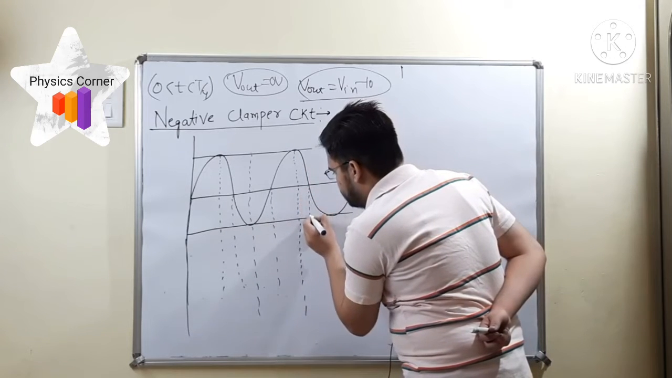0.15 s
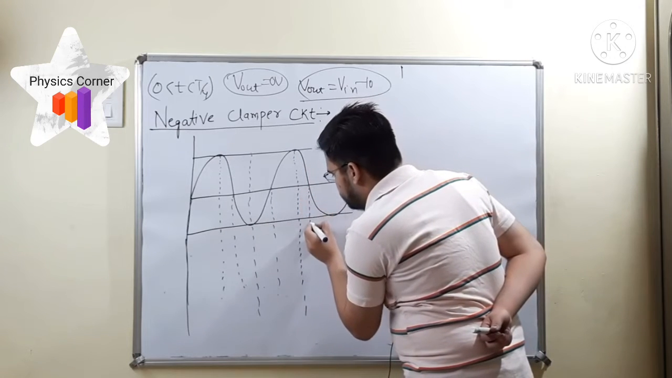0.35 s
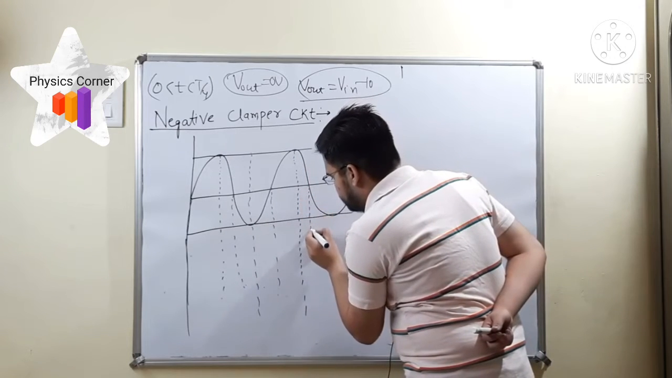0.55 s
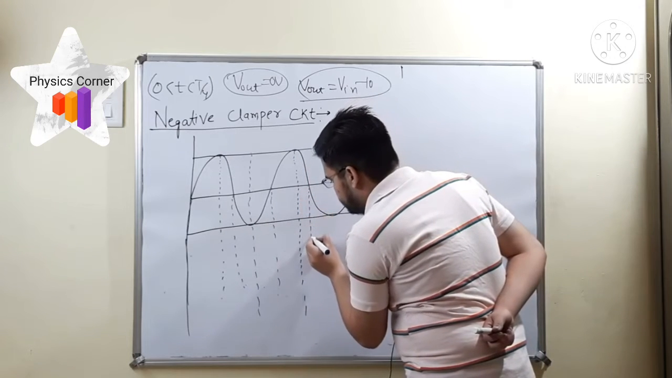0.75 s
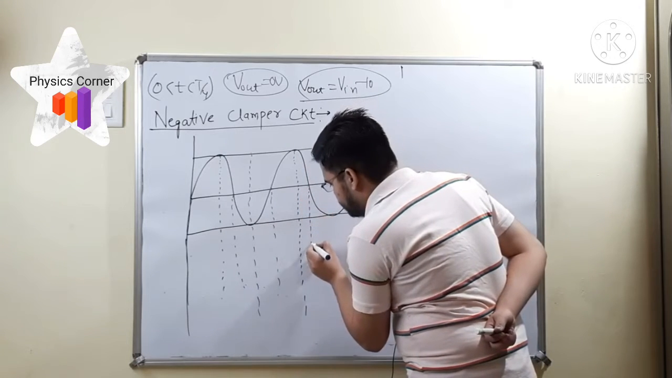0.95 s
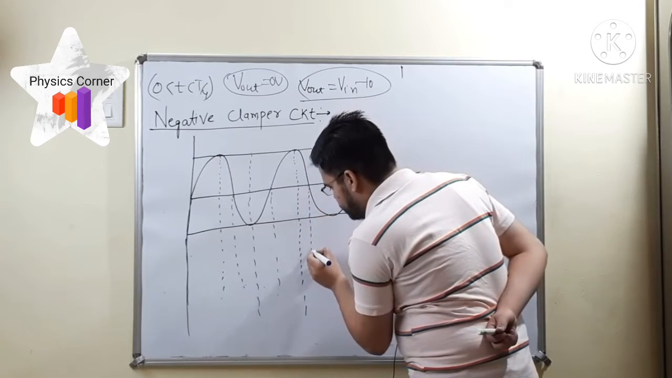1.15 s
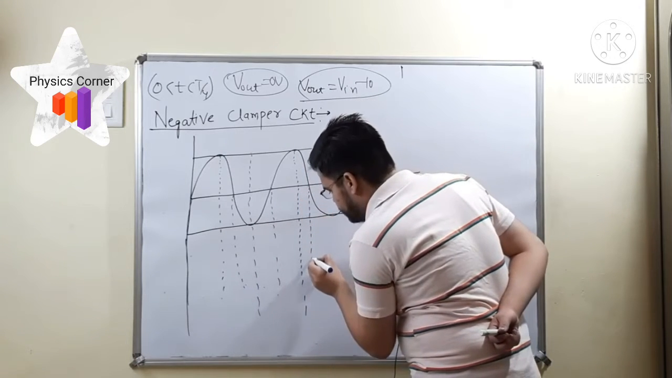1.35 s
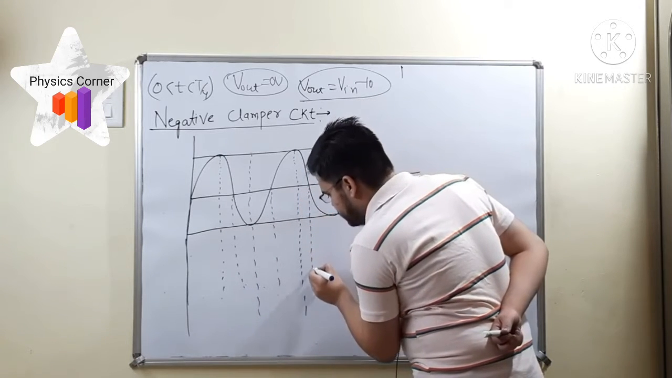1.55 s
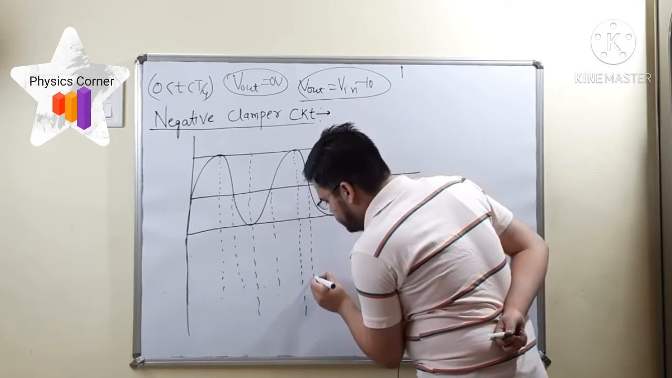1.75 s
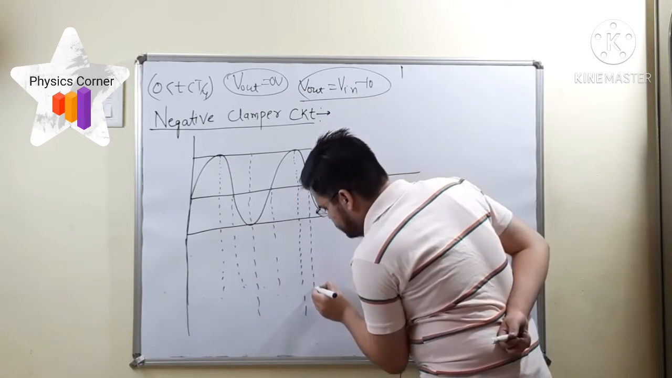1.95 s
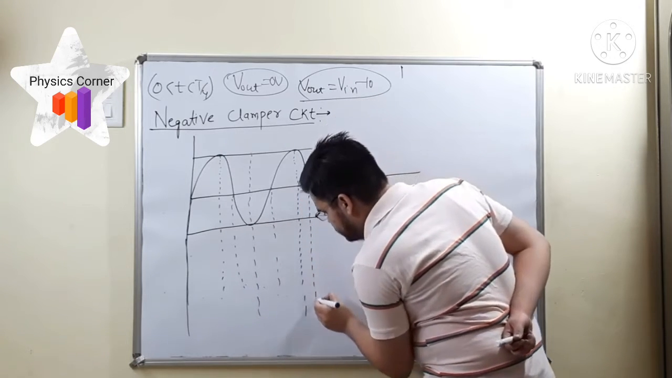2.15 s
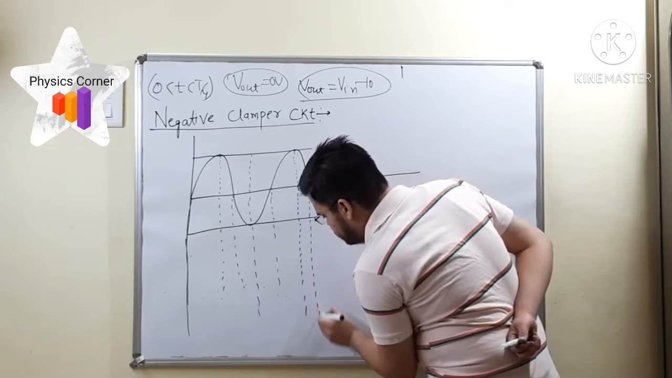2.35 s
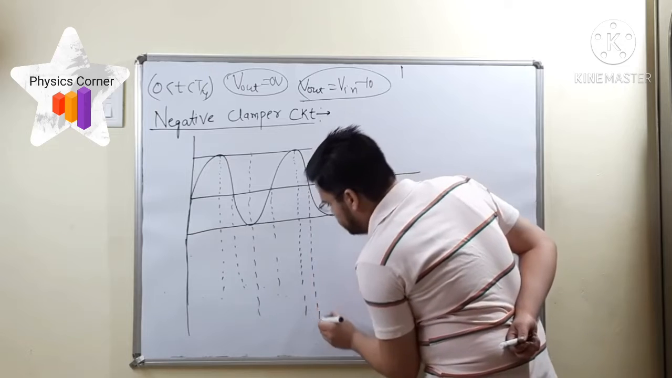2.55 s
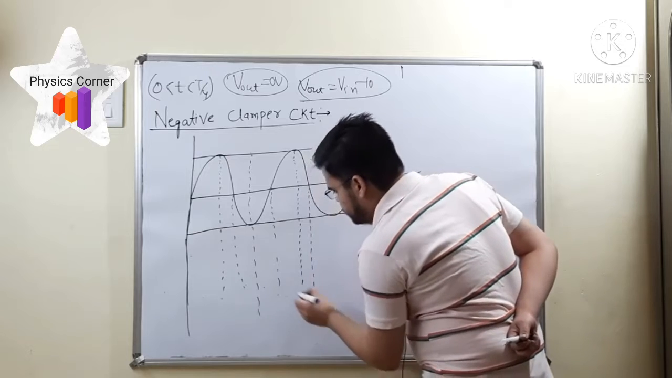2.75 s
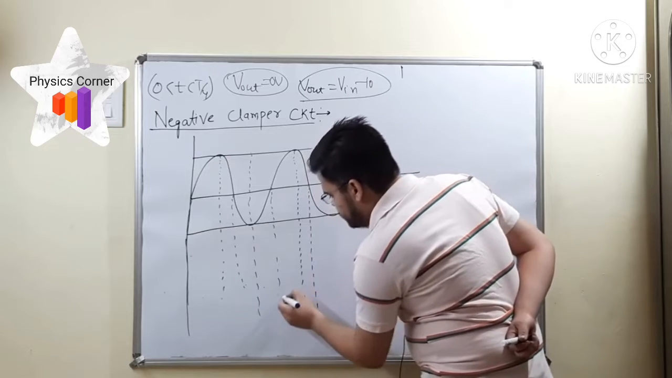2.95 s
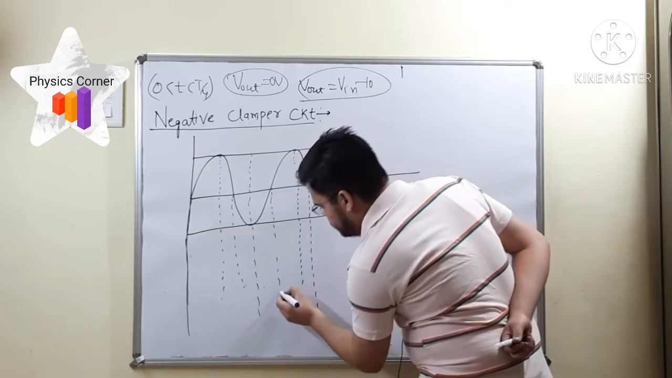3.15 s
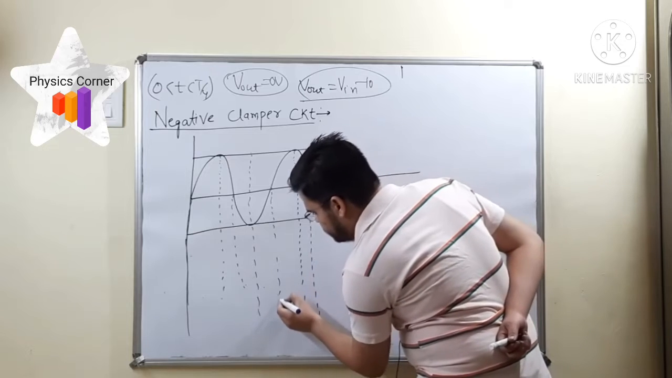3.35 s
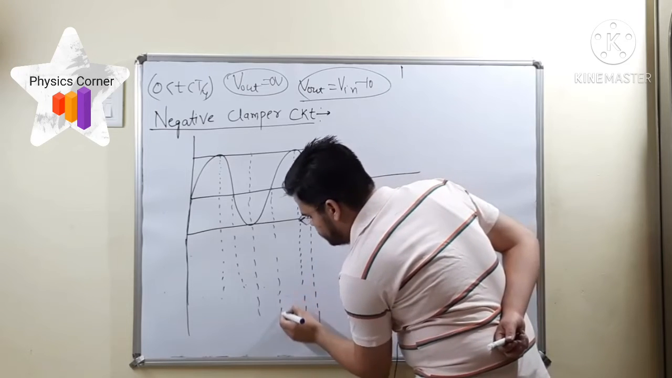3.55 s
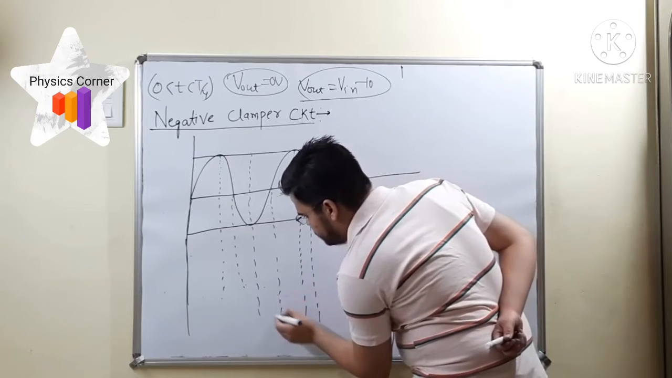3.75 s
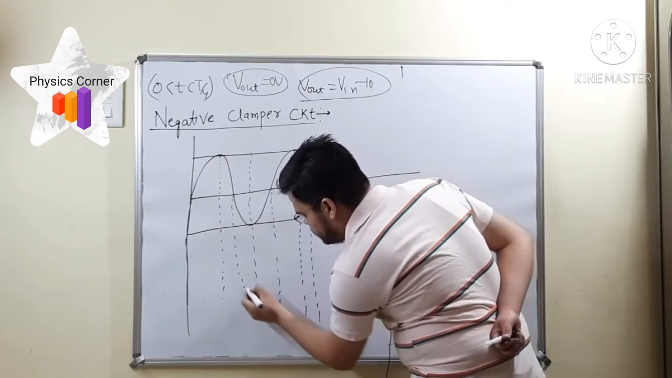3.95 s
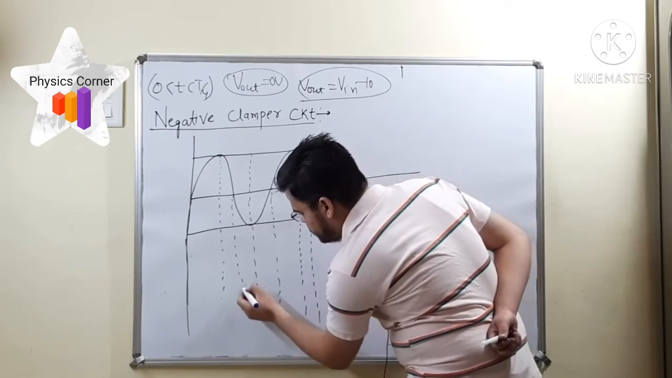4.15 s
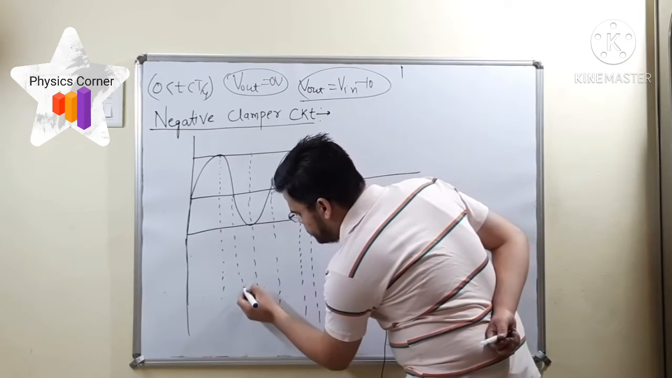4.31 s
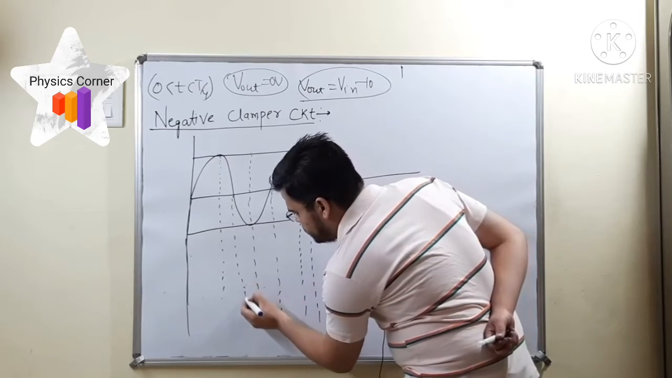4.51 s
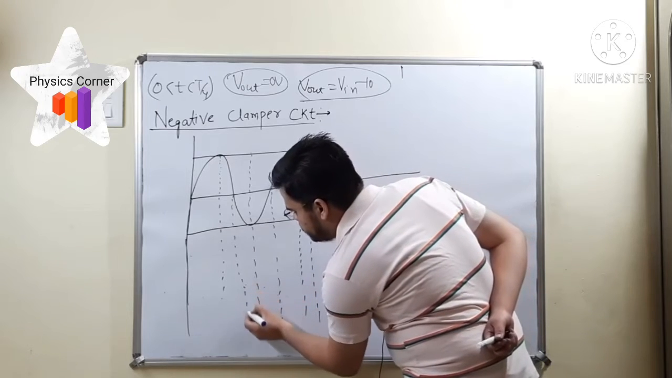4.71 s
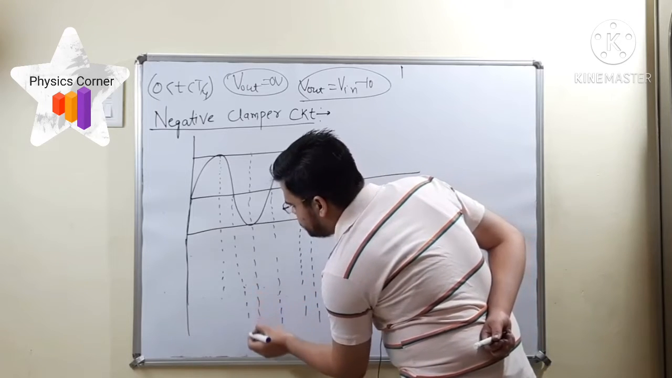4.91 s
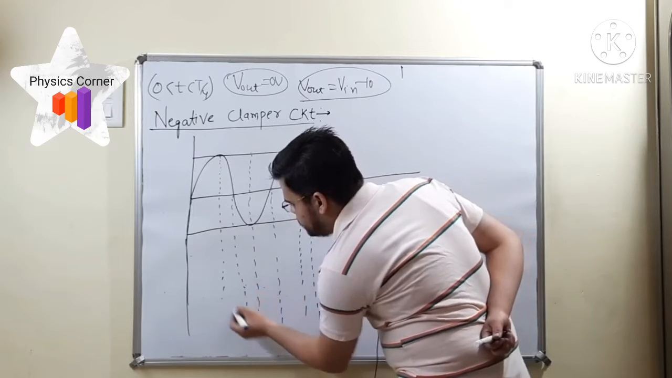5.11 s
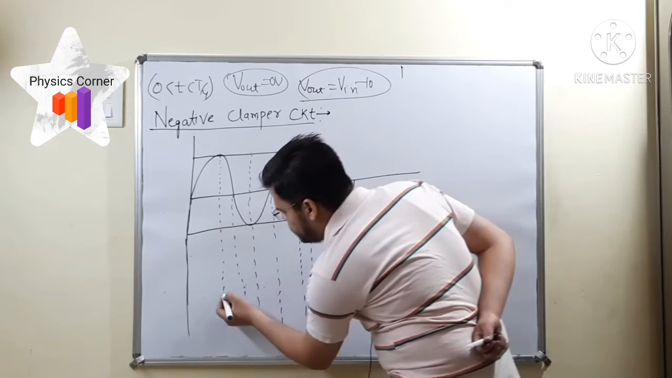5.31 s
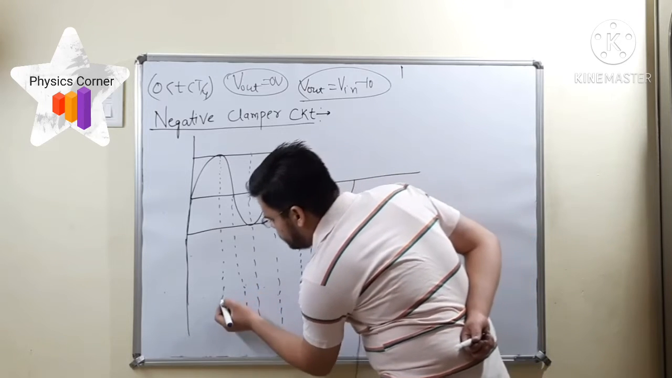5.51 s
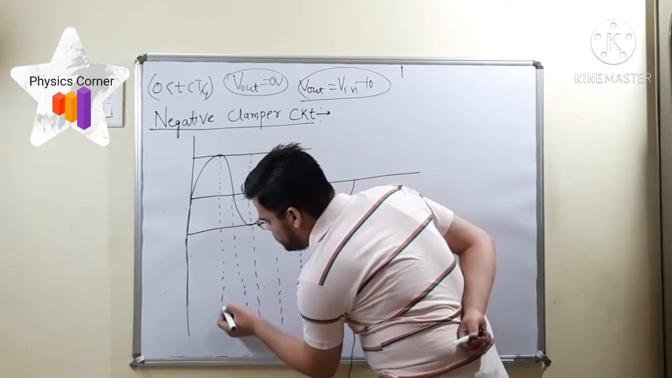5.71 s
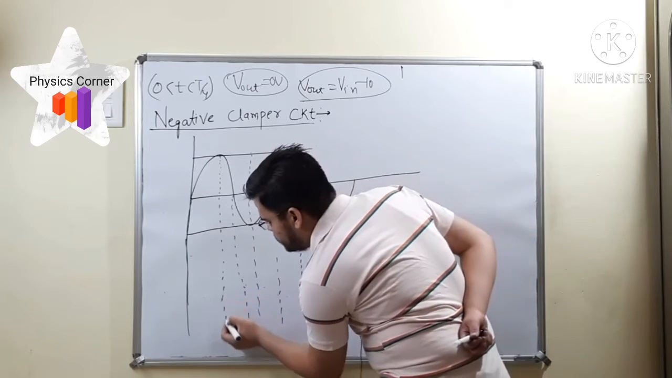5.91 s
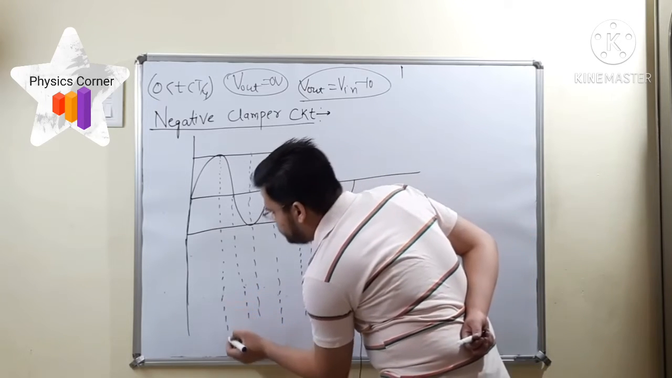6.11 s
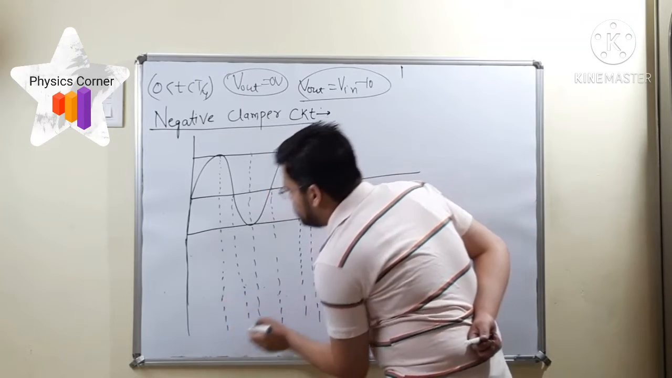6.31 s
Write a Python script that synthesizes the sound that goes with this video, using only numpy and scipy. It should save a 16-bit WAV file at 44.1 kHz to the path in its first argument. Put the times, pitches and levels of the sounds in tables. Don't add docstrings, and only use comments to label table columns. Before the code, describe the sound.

Dull panel taps from a marker come in uneven runs, with faint felt squeaks, sleeve rustles and small snaps over low room rumble.

```python
import sys
import numpy as np
from scipy import signal
from scipy.io import wavfile
from scipy.ndimage import uniform_filter1d

SR = 44100
rng = np.random.default_rng(int(sys.argv[2]) if len(sys.argv) > 2 else 0)


def boost_factor(decibels):
    exponent = np.asarray(decibels, float) / 20
    return 10 ** exponent


def generate_wav(signal):
    frames = np.transpose(np.atleast_2d(signal))
    scaled = np.clip(frames, -1, 1) * 32767
    pcm = np.round(scaled).astype(np.int16)
    wavfile.write(sys.argv[1], SR, pcm)


N = 285327
LEAD = SR // 4


def evened(x):
    return x / np.sqrt(np.mean(x ** 2) + 1e-20)


def read(points, hz):
    f, value = np.transpose(points)
    return np.interp(np.log(hz + 1), np.log(f + 1), value)


def add(mix, s, sound):
    part = mix[LEAD + round(s * SR):][:len(sound)]
    part += sound[:len(part)]


def resonate(x, modes):
    out = 0
    for k, (hz, width, db) in enumerate(modes):
        b, a = signal.iirpeak(hz, hz / width, SR)
        twice = signal.lfilter(b, a, signal.lfilter(b, a, x))
        out = out + (-1) ** k * boost_factor(db) * twice
    return out


def noise(spectrum, patchy_db, flicker_db):
    frames, hz = (N + LEAD) // 256 + 5, np.fft.rfftfreq(1024, 1 / SR)
    a, b, patches = rng.standard_normal((frames, 513, 3)).T
    patches = uniform_filter1d(patches, size=12, axis=0)
    patches = evened(uniform_filter1d(patches, size=14, axis=1))
    flicker = evened(uniform_filter1d(rng.standard_normal(frames), size=3))
    level_db = read(spectrum, hz)[:, None] + patchy_db * patches + flicker_db * flicker
    z = (a + 1j * b) * boost_factor(level_db)
    return evened(signal.istft(z, nperseg=1024, noverlap=768)[1][:N + LEAD])


def shares(s, db, upper_db, hard_db, lift_db):
    # (start [s], sway [dB], low mode [dB])
    strips = [
        (-1, 1, 2),
        (1.7, -13, 2.5),
        (3.5, -5.5, -0.2),
        (3.65, -4, -6),
        (4.2, -6, -7.5),
        (4.5, -1.5, 1),
    ]
    over = db + 25
    sway_db, low_db = [row[1:] for row in strips if row[0] <= s][-1]
    deep_db = -23.5 - 0.35 * over
    low_db = -16.5 - 0.47 * over + low_db + lift_db
    middle_db = 0.38 * upper_db
    return [0, deep_db, deep_db + sway_db, low_db, middle_db, upper_db, hard_db]


def board():
    # (time [s], blow [dB], upper modes [dB], hardness [dB]); near the frame upper modes wake
    dabs = [(0.164, -32.5, -19.5, -38), (0.358, -43.5, -35, -31), (0.543, -26, -27.5, -29.5),
            (0.964, -28, -44, -34), (1.178, -28.5, -53, -40), (1.402, -33, -58, -39),
            (1.571, -39.5, -41, -36), (1.758, -29.5, -29, -41), (1.934, -23.5, -13.5, -49),
            (2.097, -23, -11, -38), (2.272, -22.5, -12, -32), (2.396, -26, -8.5, -33),
            (3.266, -20.5, -7.5, -21), (3.434, -22, -7.5, -30.5), (3.583, -18.5, -3.5, -24.5),
            (3.697, -22, -3.5, -29), (4.323, -26.5, -10.5, -27), (4.506, -21.5, -10, -33),
            (4.665, -22.5, -6.5, -30), (4.812, -22, -4, -23), (5.63, -29, -5.5, -21.5),
            (5.814, -26.5, -7, -34), (5.963, -24.5, -3.5, -26.5)]
    earlier_dab = (-.05, -31, -14, -30)
    # (time [s], blow [dB], upper modes [dB])
    lifts = [
        (0.062, -41, -18),
        (0.636, -43, -30),
        (0.678, -45.5, -34),
        (0.767, -52.5, -19),
        (1.055, -63, -25),
        (1.099, -45.5, -24),
        (3.753, -35, -3),
        (4.459, -51, -6.5),
        (4.948, -38.5, -24),
        (6.098, -36, -8),
    ]
    # (pitch [Hz], level [dB], hold [s])
    panel = [
        [(209, -41, 0.0073), (245.2, 4, 0.024), (268.8, -6, 0.019)],
        [(39.2, 5.5, 0.075)],
        [(71.5, 5.5, 0.13)],
        [(141.7, 4.5, 0.033)],
        [(329.2, -8.5, 0.031)],
        [(397.8, 7, 0.014), (466, -8.5, 0.01)],
        [(589, 8.5, 0.011), (670, -4, 0.0069), (803, 0, 0.011), (1053, -7, 0.0065)],
    ]
    # (pitch [Hz], level [dB], time to fall 60 dB [s])
    frame = [
        [(234.55, -14.5, 0.49), (255.3, -28.5, 1), (221, -33, 0.39)],
        [(57, -7, 0.57)],
        [(77.7, 6, 0.76)],
        [(134.05, -2, 0.45), (118, -13, 0.14)],
        [(339, -21, 0.69)],
        [(386, -17, 0.71), (456.1, -14.5, 0.27)],
        [(570, -14, 0.98), (510, -16.5, 0.4), (629.5, -7.5, 0.19)],
    ]
    facing = [1, 1, 1, 1, -1, -1, -1]
    build_s = [0.0035, 0.017, 0.0036, 0.0028, 0.0075, 0.0036, 0.0022]
    lift_hard_db, lift_low_db = -31.5, -18

    blows = [(*row, 0) for row in [earlier_dab, *dabs]]
    blows += [(*row, lift_hard_db, lift_low_db) for row in lifts]
    detune = 1 + .01 * rng.standard_normal((len(blows), len(panel)))
    out, t = np.zeros(N + LEAD), np.arange(SR // 2) / SR
    rings = []
    for group in frame:
        ring = 0
        for hz, db, t60 in group:
            fade = boost_factor(db - 60 * t / t60) * (1 - np.exp(-t / 0.0046))
            ring = ring + fade * np.sin(2 * np.pi * hz * t)
        rings.append(ring)

    t = t[:SR // 10]
    for (s, db, *touch_db), shift in zip(blows, detune):
        groups = zip(panel, rings, facing, shares(s, db, *touch_db), shift, build_s)
        for group, ring, sign, group_db, d, build in groups:
            swell = 1 - np.exp(-(t / build) ** 1.5)
            for hz, level_db, hold in group:
                drop = np.exp(-(t / hold) ** 2.8)
                mode = swell * drop * np.sin(2 * np.pi * hz * d * t)
                add(out, s - .003, sign * boost_factor(db - 4.0 + group_db + level_db) * mode)
            add(out, s - .003, sign * boost_factor(db + group_db) * ring)
    return out


def drag():
    # (time [s], level [dB], barrel pitch [Hz], length [s])
    drags = [(0.173, -64, 5830, 0.096), (0.343, -64.5, 5450, 0.093), (0.54, -64, 5700, 0.12),
             (0.72, -66, 5570, 0.088), (0.9632, -61, 6160, 0.045), (1.174, -58, 6100, 0.088),
             (1.396, -58, 6130, 0.08), (1.572, -57, 6040, 0.072), (1.76, -58, 6160, 0.05),
             (1.932, -55, 5840, 0.053), (2.096, -53.5, 5700, 0.056), (2.27, -54.5, 5600, 0.032),
             (2.396, -50.5, 5700, 0.063), (3.274, -56, 5750, 0.036), (3.431, -59.5, 5600, 0.039),
             (3.58, -52, 5700, 0.035), (3.7, -50, 5960, 0.033), (4.66, -62, 6100, 0.037),
             (4.811, -57, 5700, 0.037), (5.59, -62, 6060, 0.073), (5.9633, -57, 5500, 0.051),
             (6.067, -55, 5650, 0.027)]
    # (share of the pitch, width [Hz], level [dB])
    barrel = [
        [(.75, 600, -4), (.99, 650, 6), (1.14, 805, -0.5)],
        [(1.4, 1110, 0)],
        [(1.73, 860, 14), (1.98, 1100, 6)],
    ]
    slack_hz = 5600

    out = np.zeros(N + LEAD)
    size = (len(drags), 6000)
    slips = rng.standard_normal(size) * boost_factor(2.5 * np.minimum(rng.exponential(1, size), 4))
    for (s, db, hz, length), slip in zip(drags, slips):
        shade_db = -10 * (s > 5.9)
        middle_db = -3 - 11 * 10 * (hz / slack_hz - 1) + shade_db
        band_db = [0, middle_db, -5 + shade_db]
        u = np.linspace(0, 1, int(np.clip(length * SR, 50, len(slip))))
        landing = 0.25 * np.exp(-u / 0.018)
        stroke = np.minimum(u / 0.037, 1) * (np.sqrt(1 - u ** 4.2) + landing)
        marker = 0
        for level_db, band in zip(band_db, barrel):
            modes = [(hz * share, width, mode_db) for share, width, mode_db in band]
            marker = marker + boost_factor(level_db) * evened(resonate(slip, modes))
        add(out, s, boost_factor(db - 10.5) * stroke * marker[:len(u)])
    return out


def snaps():
    # (time [s], peak [dB], pitch [Hz], length [cycles])
    creaks = [
        (1.36, -52, 7000, 15),
        (5.205, -43, 2310, 5.6),
        (5.249, -45, 1380, 3.3),
        (5.384, -37.5, 2580, 5.1),
        (5.779, -42, 6400, 5),
        (5.811, -53, 5800, 8.9),
        (2.445, -60, 11600, 10),
        (5.62, -53, 7240, 30),
    ]
    knuckle = [
        (5.3147, -35, 680, 4),
        (5.3146, -37, 1180, 3.5),
        (5.384, -42, 420, 2.5),
    ]
    out = np.zeros(N + LEAD)
    for s, db, hz, cycles in [*creaks, *knuckle]:
        turns = np.arange(round(3 * cycles / hz * SR)) * hz / SR
        fade = np.exp(-2.5 * turns / cycles) * np.minimum(3 * turns, 1)
        add(out, s, boost_factor(db) * np.sin(2 * np.pi * turns) * fade)
    return out


def sleeve():
    # (peak time [s], level [dB], rise [s], fall [s], dull share [dB])
    swishes = [
        (2.54, -59, 0.083, 0.15, -8),
        (3.93, -67, 0.089, 0.24, 0.5),
        (5.2, -58.5, 0.097, .16, -0.5),
        (5.371, -52, 0.046, .04, -8),
        (5.419, -64.5, 0.08, 0.17, -5),
        (5.96, -75.5, 0.21, 0.14, 10.5),
    ]
    # (pitch [Hz], level per Hz [dB])
    cloth = [(1800, -11), (3200, -8.5), (4900, -2.5), (7000, -6), (9000, -6), (11300, -3.5), (13500, -15),
             (15400, -23)]
    fold_colour = [(250, -45), (600, 6.0), (1200, 2), (2200, -1.0), (3500, -1.0), (4500, -15)]
    fibre = noise(cloth, patchy_db=1.8, flicker_db=1.5)
    fold = noise(fold_colour, patchy_db=1.4, flicker_db=1.2)
    t, out = (np.arange(N + LEAD) - LEAD) / SR, 0
    for s, db, rise, fall, dull_db in swishes:
        away = np.where(t < s, (s - t) / rise, (t - s) / fall)
        level = boost_factor(db - 16.5 * away ** 1.58)
        out = out + level * (fibre + boost_factor(dull_db) * fold)
    return out


def clock():
    tick_db = [-58, -57.5, -58.5, -55.5, -57, -54.5, -56.5]
    # (pitch [Hz], width [Hz], level [dB])
    case = [(802, 184, -0.5), (975, 220, -7), (1200, 380, -12.5), (1630, 650, -12.5), (2510, 170, -9.5),
            (2810, 290, -7.5), (3520, 4500, -21), (5700, 1200, -19)]
    steps, t = np.zeros(N + LEAD), np.arange(SR // 10) / SR
    rattle = rng.standard_normal((len(tick_db), len(t))) * np.exp(-t / 0.047)
    for k, db in enumerate(tick_db):
        add(steps, 0.97 + k - 1, boost_factor(db + 11.5) * rattle[k])
    return resonate(steps, case)


def room(x):
    # (pitch [Hz], time to fall 60 dB [s])
    echo_times = [(40, .6), (130, 0.79), (240, 0.86), (400, 1.015), (700, 0.44), (1500, 1.09), (4000, 0.29),
                  (10000, 0.13)]
    taps = np.zeros((3, SR))
    at = np.arange(300, SR - 20, 20) + rng.integers(0, 20, (3, (SR - 301) // 20))
    np.put_along_axis(taps, at, rng.choice([-1., 1.], at.shape), axis=1)
    hz, t, z = signal.stft(taps, SR, nperseg=1024)
    fade = boost_factor(-60 * t / read(echo_times, hz)[:, None])
    tails = signal.istft(z * fade, SR, nperseg=1024)[1]
    tails *= np.clip((np.arange(tails.shape[1]) / SR - .008) / 0.01, 0, 1)
    tails = tails / np.linalg.norm(tails[0])
    phase = .9 * np.arange(len(x)) / SR + np.arange(3)[:, None] / 3
    turns = np.sqrt(2 / 3) * np.cos(np.pi * phase)
    return signal.fftconvolve(x * turns, tails, axes=1).sum(0)[:len(x)]


def air():
    # (time [s], level [dB])
    traffic = [(0.0, -57), (0.12, -55), (0.29, -60), (1.04, -54), (1.15, -69), (1.71, -60), (2.25, -52.5),
               (2.65, -57), (3.19, -62), (3.51, -61), (4.03, -56.5), (4.81, -58.5), (5.32, -59.5),
               (5.91, -52.5), (6.16, -53), (6.47, -49)]
    # (pitch [Hz], level per Hz [dB])
    steady_colour = [(15, 27), (35, 23), (70, 19), (120, 7), (160, 19.5), (250, 12.5), (400, 6.5),
                     (700, 3.5), (1500, -1.5), (4000, -6), (7000, -9), (10500, -9), (13000, -12.5), (15400, -15.5)]
    rumble_colour = [(25, -18), (55, -21.0), (75, 10), (100, -12.0), (140, -13), (200, -41.5)]
    s, db = np.transpose(traffic)
    swell = boost_factor(np.interp((np.arange(N + LEAD) - LEAD) / SR, s, db) - 3)
    rumble = noise(rumble_colour, patchy_db=1.5, flicker_db=0.0)
    steady = noise(steady_colour, patchy_db=1.38, flicker_db=0.94)
    return boost_factor(-57.5) * steady + swell * rumble


def scene():
    thump, near, far = board(), drag() + snaps() + sleeve(), clock()
    echo = room(boost_factor(-16.0) * thump + boost_factor(-13) * near + boost_factor(2.0) * far)
    return (thump + near + boost_factor(0.5) * far + echo + air())[None, LEAD:]


def band_limit(x):
    return signal.sosfilt(signal.butter(12, 15490, fs=SR, output="sos"), x)


def record(dry):
    edge = signal.firwin(511, 15450, window=("kaiser", 9), fs=SR)
    mix = signal.oaconvolve(dry, edge[None], "same")
    return band_limit(mix)


dry = scene()
out = record(dry)
generate_wav(out)
```